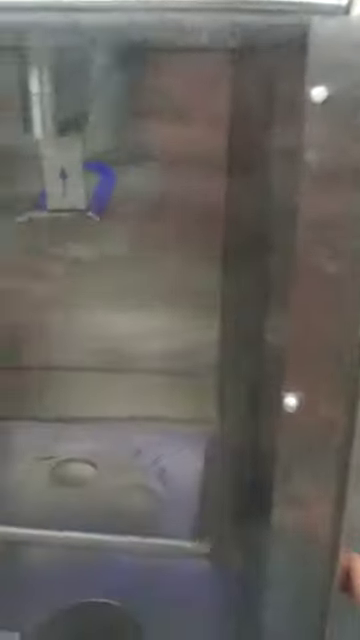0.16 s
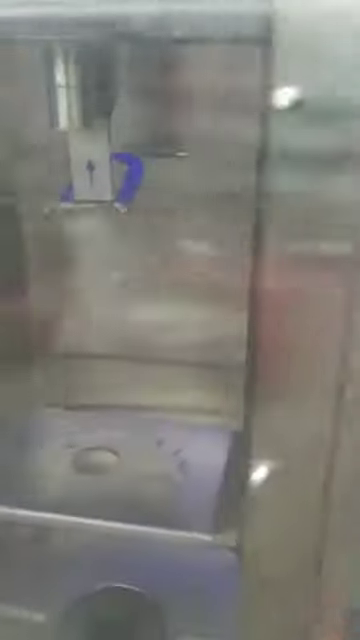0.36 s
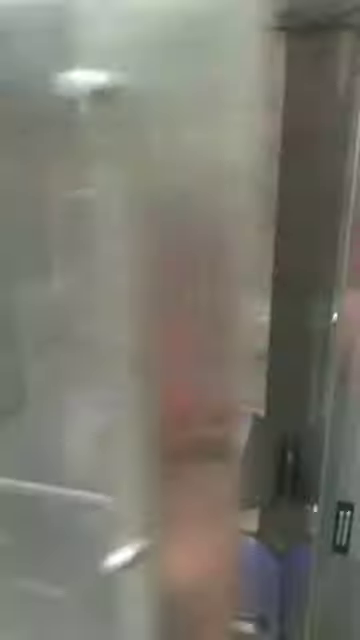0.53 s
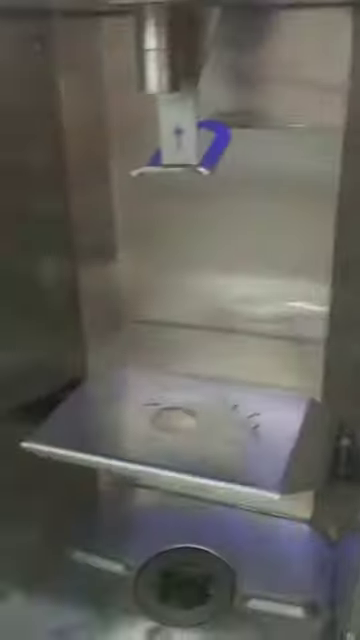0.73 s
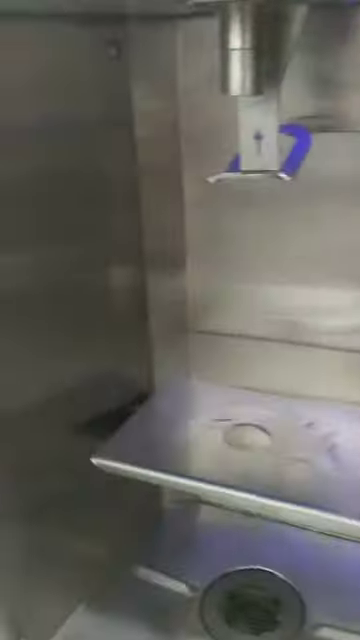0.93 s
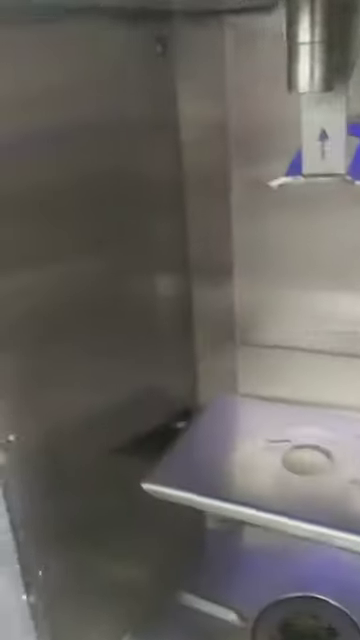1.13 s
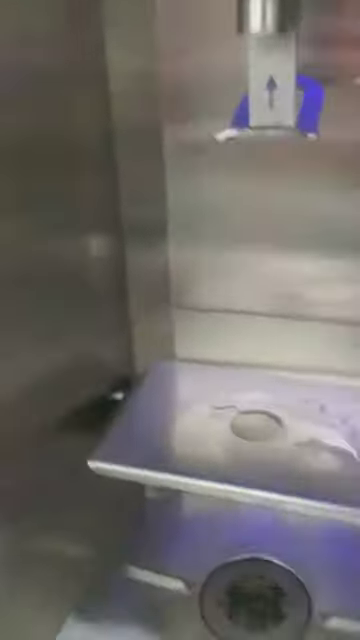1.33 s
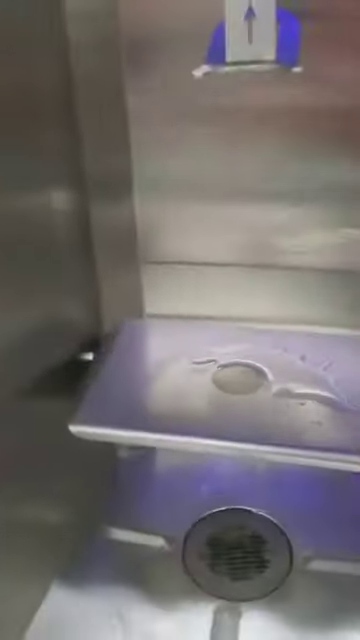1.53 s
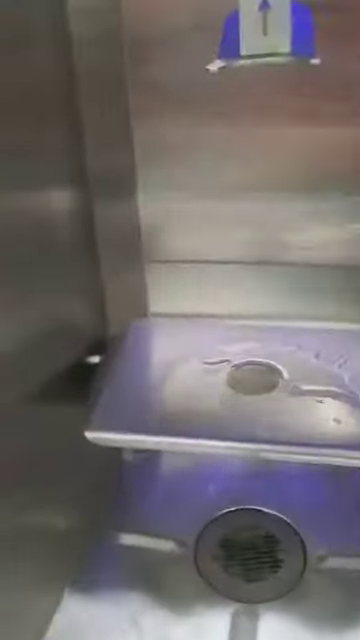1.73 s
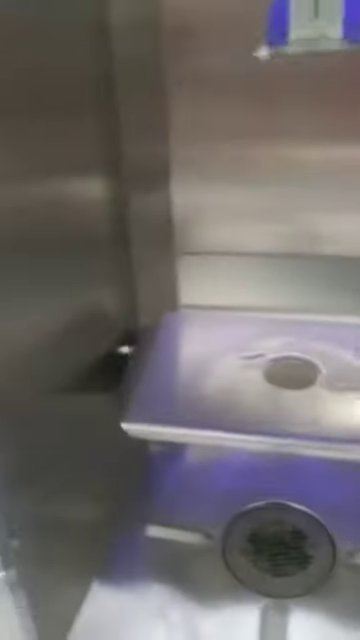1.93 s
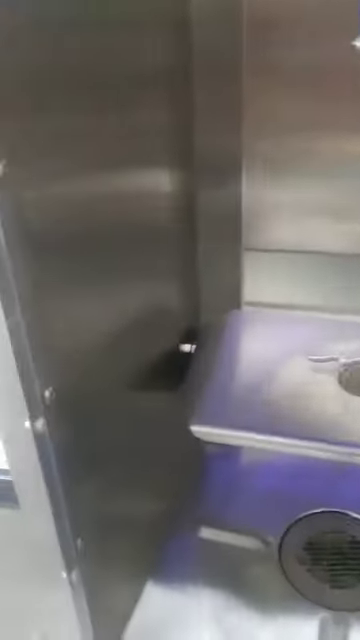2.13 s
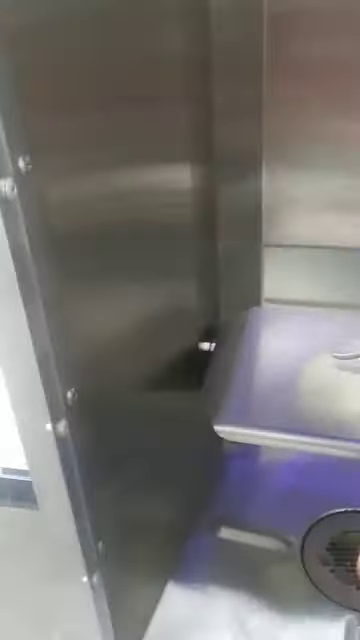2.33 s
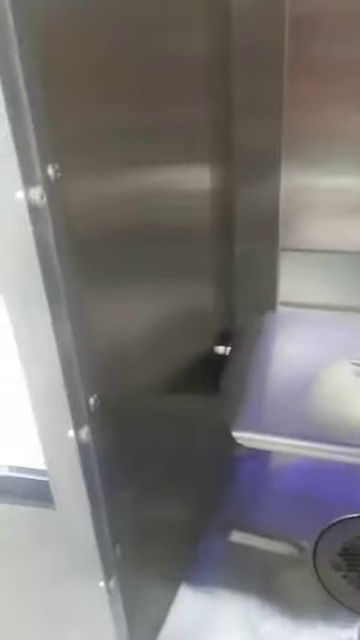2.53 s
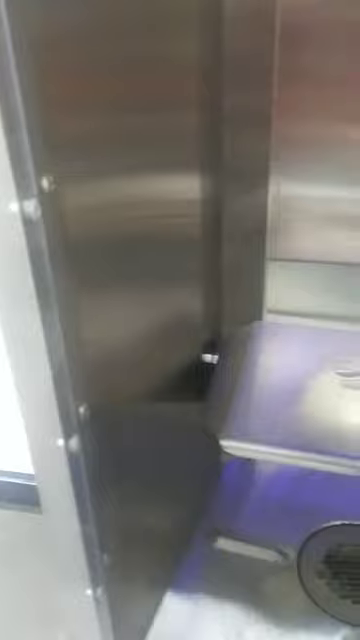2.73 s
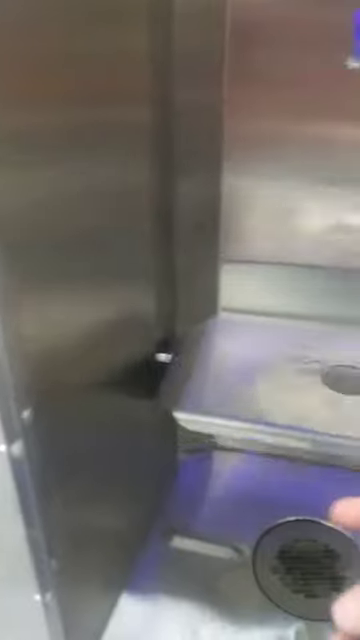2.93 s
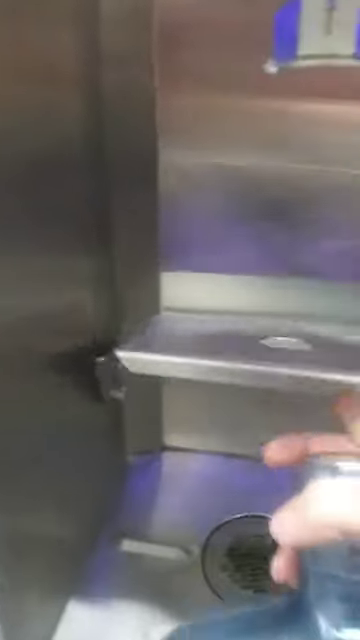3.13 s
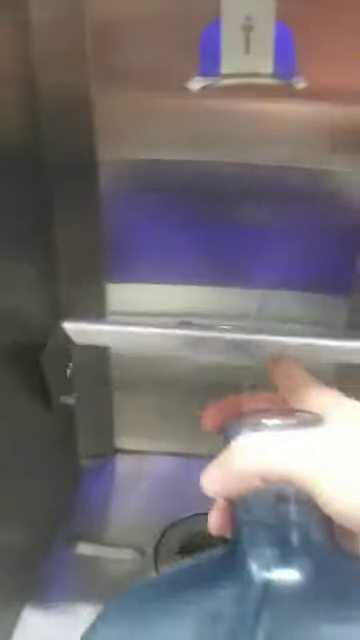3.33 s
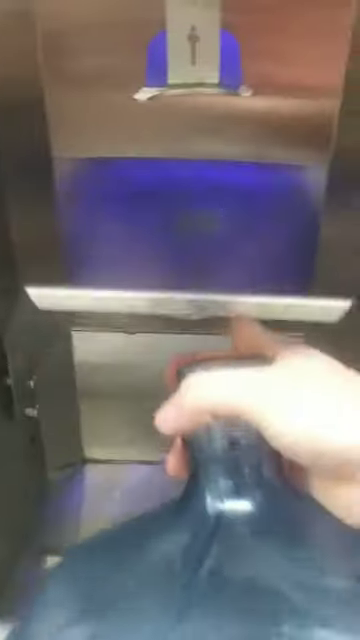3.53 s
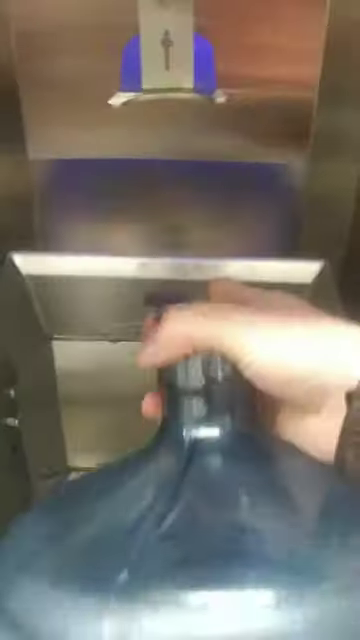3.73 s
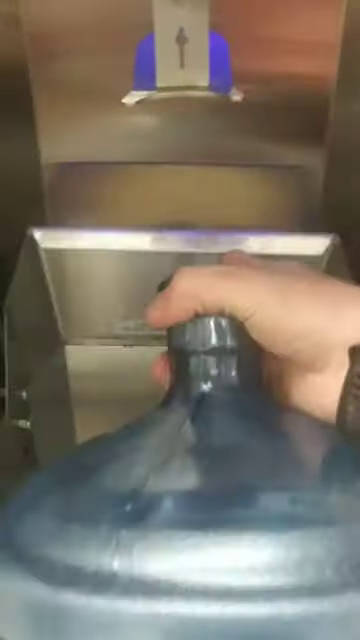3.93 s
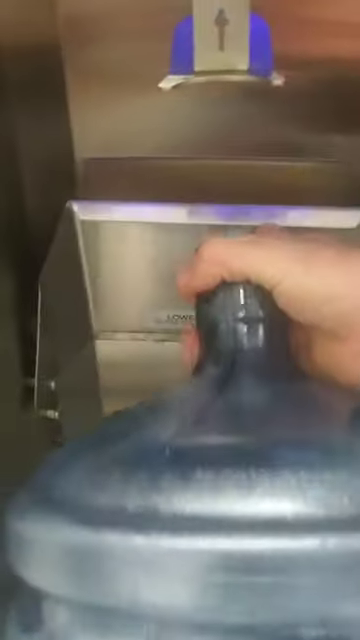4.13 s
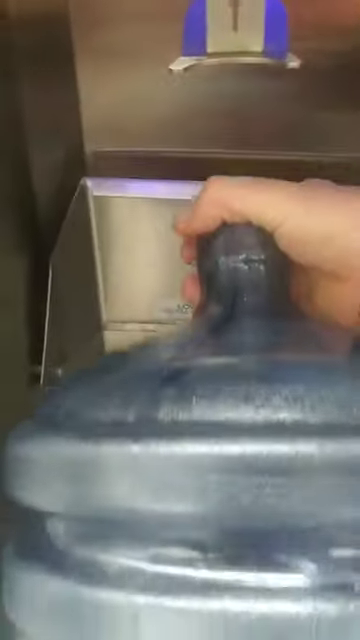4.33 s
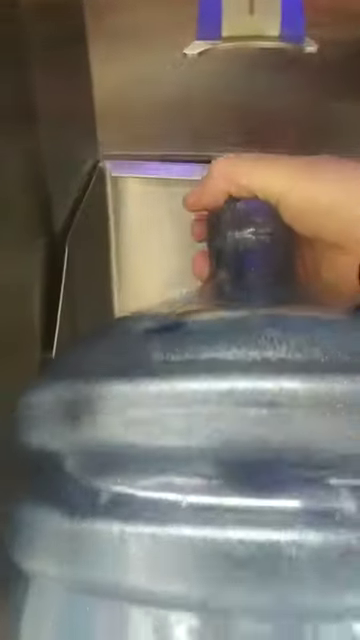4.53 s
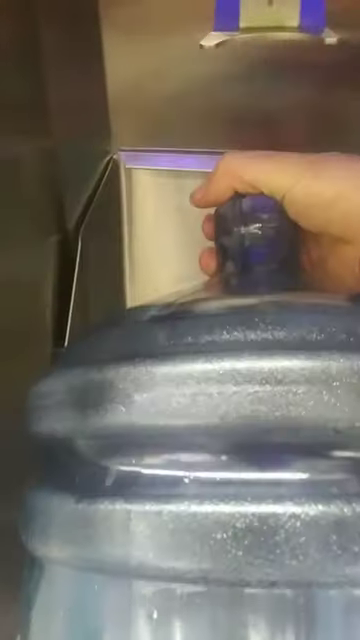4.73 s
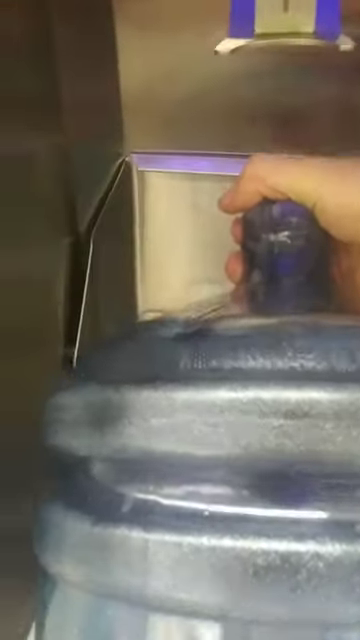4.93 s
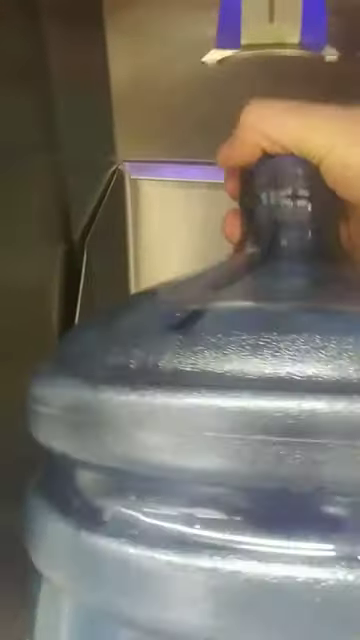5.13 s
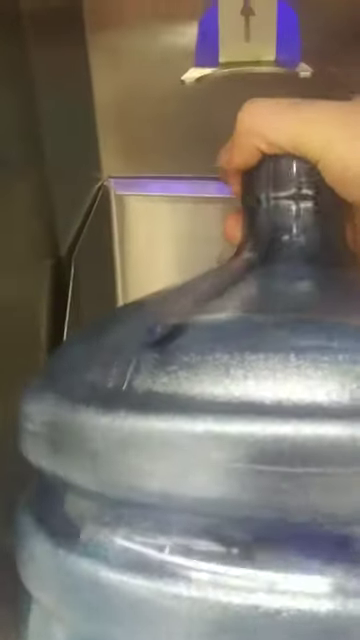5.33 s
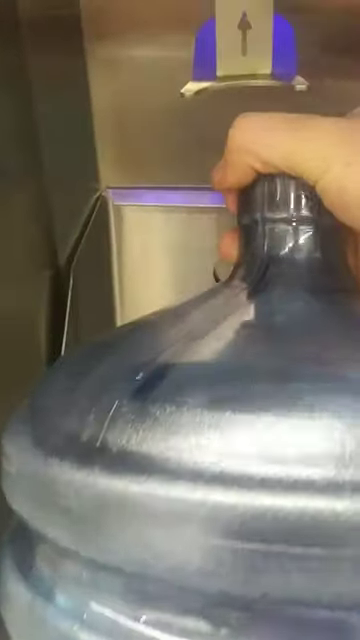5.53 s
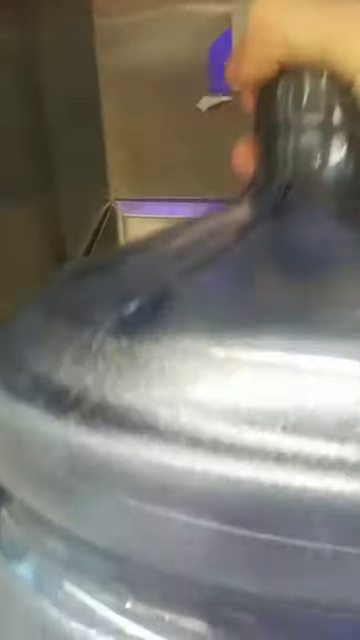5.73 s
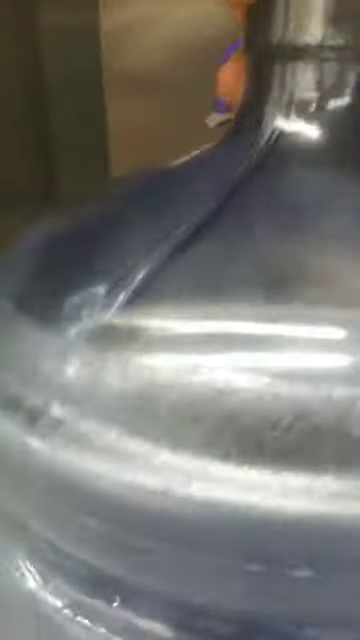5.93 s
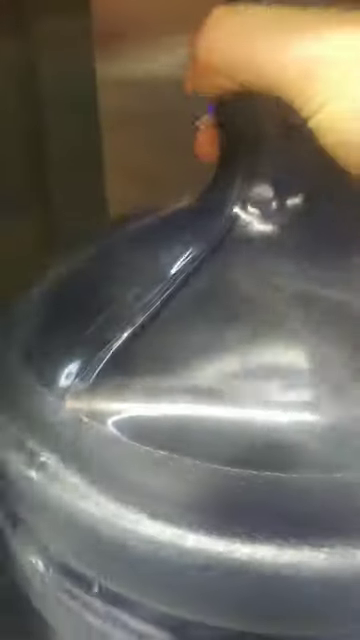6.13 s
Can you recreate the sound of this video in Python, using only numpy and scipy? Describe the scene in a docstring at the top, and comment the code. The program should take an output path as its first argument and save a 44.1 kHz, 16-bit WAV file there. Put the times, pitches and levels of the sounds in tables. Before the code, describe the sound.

A low, wavering machine hum and fan rumble run throughout, heard close up at the mouth of a steel water refill compartment. A sleeve brushes softly near the microphone, with small handling ticks. At about 0.3 seconds a door latch clicks, a light tap follows near 2 seconds, and at 2.5 the steel door meets its stop with a ringing clunk. A faint, thin hiss begins around 3.1 seconds. From 3.6 to 4.5 an empty plastic jug knocks against a hinged flap and the walls in a quick run of loud, hollow thumps. At 4.7 the flap claps on the back wall, sharp and bright. Around 5 seconds the jug squeaks faintly and scrapes along the steel in short, groaning shoves. Heavy bumps land at about 5.3, 5.4, 5.7 and 5.8 seconds, each leaving the sheet metal ringing.

```python
"""A machine hums and a sleeve brushes past, close to a phone microphone at the mouth of a water-refill
compartment. The steel door is unlatched and swings open against its stop. An empty plastic jug is
brought up with a thin hiss and shoved in: it knocks a hinged flap up, the flap claps on the back wall,
and the jug scrapes, squeaks and bumps into place. Every blow rings the sheet-steel cabinet."""
import sys
import numpy as np
from scipy import signal
from scipy.fft import rfft, irfft
from scipy.io import wavfile
from scipy.ndimage import uniform_filter1d

SR = 44100
rng = np.random.default_rng(int(sys.argv[2]) if len(sys.argv) > 2 else 0)


def inscribe(sig):
    """Save sig as 16-bit PCM at rate SR to the path in sys.argv[1].

    A 1-D sig is mono; a 2-D sig holds one channel per row.
    Samples are clipped to [-1, 1] before scaling.
    """
    pcm = np.round(np.clip(np.atleast_2d(sig).T, -1, 1) * 32767)
    wavfile.write(sys.argv[1], SR, pcm.astype(np.int16))


N = 272097
TIME = np.arange(N) / SR
RING_TIME, BLOW_TIME = TIME[:int(1.6 * SR)], TIME[:int(.45 * SR)]

# hum of the machine behind the cabinet: time_s, level_db
HUM_LEVEL = [(0, -47.5), (.95, -43.5), (1.25, -63), (2.0, -50), (3.3, -47.5), (4.9, -56)]
# spectrum of its fan: frequency_hz, gain_db
FAN_COLOUR = [(25, 3.5), (55, 2.5), (85, -4), (125, 0.5), (220, -1), (340, 2), (550, -7), (900, -12),
              (1800, -18.5), (3500, -28), (7000, -30.5), (10000, -39), (15000, -43)]
# hand and sleeve brushing past: start_s, length_s, level_db
SLEEVE_STROKES = [(0, 0.047, -47.5), (0.61, 0.12, -60), (0.864, 0.071, -60.5), (1.497, 0.023, -62),
                  (1.727, 0.017, -52), (2.987, 0.11, -46.5), (3.316, 0.47, -63.5), (3.816, 0.15, -56),
                  (4.25, 0.28, -59)]
# spectrum of that brushing: frequency_hz, gain_db
SLEEVE_COLOUR = [(200, -25), (1000, -7), (2500, 6.5), (4000, 5), (5100, 4), (7500, 7), (10000, 1),
                 (15000, -5.5)]
# small handling ticks: start_s, level_db
HAND_TICKS = [(.434, -54), (1.098, -56), (1.985, -54), (2.099, -51.5), (2.641, -44)]
# hard edges of steel and plastic at first touch: start_s, level_db
EDGE_SNAPS = [(.3222, -36), (1.945, -44), (2.472, -40), (4.7077, -17.5), (5.2878, -35)]
# latch, door and jug striking the cabinet, each a soft thud plus a hard crack (short contact is brighter):
# start_s, thud_db, thud_top_hz, crack_db, crack_top_hz, crack_fall_db_per_octave,
# tail_db, flap_ring_db, back_ring_db, damping_db_per_s
CABINET_BLOWS = [(.323, -49, 350, -47.5, 10000, 10, -1, -69, -68, 40),
                 (.331, -37.5, 480, -44.5, 4000, 3, -4, -58, -53, 40),
                 (1.956, -42, 950, -53, 1500, 3, 0, -57, -68, 30),
                 (2.473, -27.5, 900, -29.5, 4030, 3, 2.5, -64, -67, 20),
                 (2.484, -30.5, 720, -36.5, 4500, -3, 1, -38.5, -42.5, -2),
                 (3.593, -18, 695, -32.5, 2000, 6, -1, -27, -45, 0),
                 (3.711, -18, 650, -43.5, 3000, 5, -4, -30, -45, 30),
                 (3.802, -17, 670, -41, 2200, 6.5, -11, -33.5, -58, 19),
                 (3.845, -19, 600, -42.5, 2010, 12, -11.5, -27.5, -51, 10),
                 (3.887, -28, 456, -45.5, 2000, 6, -9, -55, -61, 18),
                 (3.929, -27, 452, -49, 3520, 4, -4, -32, -50, 0),
                 (4.036, -25.5, 527, -47, 3000, 8, 0, -32, -53, 19),
                 (4.314, -23, 480, -39, 1614, 6.5, -1, -26.5, -47, 11),
                 (4.337, -30.5, 458, -43, 1600, 14, -4, -57, -55, 18),
                 (4.482, -34.5, 400, -40, 2015, 26, 3, -41.5, -53, 11),
                 (4.707, -33, 695, -15, 9600, 1.5, -2, -38, -28.5, 47),
                 (5.143, -27, 300, -41.5, 2500, 18, -3, -40, -55, 29),
                 (5.206, -35, 350, -42.5, 2500, 12, -7, -53, -36, 41),
                 (5.232, -28, 400, -41.5, 2500, 8, -7, -52, -47, 40),
                 (5.286, -18, 440, -18, 4600, 5, -1, -38, -16, 19),
                 (5.3825, -20.5, 504, -26, 1800, 8.5, -3.5, -30, -49, 27),
                 (5.575, -28, 402, -55, 1800, 11, -4, -49, -41, 46),
                 (5.7233, -20, 487, -26.5, 2420, 7.5, -11, -30, -25, 48),
                 (5.807, -21, 320, -28.5, 2600, 3.5, -4, -34, -38, 14)]
# crowded, short-lived modes of plastic and steel: frequency_hz, base_t60_s, tail_t60_s, tail_db
KNOCK_DECAY = [(100, 0.14, 1, -10.5), (350, 0.093, 0.65, -3.5), (790, 0.17, 0.52, -7),
               (2000, 0.11, 0.55, -18.5), (7000, 0.044, 0.33, -15), (10860, 0.055, 0.14, -16)]
# hollow shell of the jug: pitch_hz, level_db, t60_s
JUG_SHELL = [(128, -7, 0.15), (170.8, 1.5, 0.21), (227.7, 1.5, 0.13), (315.8, -1.5, 0.19),
             (388.3, -0.5, 0.17), (471.5, -1.5, 0.066), (544.3, -4.5, 0.15), (649.6, 4, 0.071),
             (697, -7.5, 0.28), (775, -14, 0.16), (880, -20, 0.1), (1113, -10, 0.13), (1254, -11.5, 0.19),
             (1495, -4.5, 0.17), (1890, -7, 0.15), (2184, -10, 0.17), (2960, -8, 0.1), (4820, -4.5, 0.069)]
# flap and side walls: pitch_hz, level_db, t60_s
FLAP_AND_SIDES = [(117.97, 0, 1.7), (164.35, 1, 1.62), (197, -5, 0.2), (215.9, 2, 0.81), (249.2, 1, 1.34),
                  (316, -5.5, 1.13), (357, -15, 0.73), (470, -32, 0.33), (549, -7.5, 0.56), (627, -5, 0.32),
                  (688, -15, 0.22), (759, -9, 0.29), (1140, -13.5, 0.42), (2030, -8.5, 0.36),
                  (2860, -16, 0.16)]
# back wall: pitch_hz, level_db, t60_s
BACK_WALL = [(120.7, -13, 3.3), (208.4, 1.5, 0.47), (242, -6, 3), (242.3, -12, 1.7), (327, -2, 0.18),
             (360.2, 6, 0.85), (385.6, -2, 0.42), (422.5, -6.5, 0.75), (449, -4, 0.95), (627, -9, 0.88),
             (801, -16.5, 0.97), (928, -15.5, 0.86), (1016, -26, 0.27), (1120, -15.5, 0.44),
             (1347, -20.5, 0.65), (1490, -24, 0.3), (1670, -15, 0.18), (1890, -12.5, 0.16),
             (2210, -26, .35)]
# steel door: pitch_hz, level_db, t60_s
STEEL_DOOR = [(108, -13, 1.2), (116.7, -14, 3.9), (180.4, 5.5, 0.14), (320, -2.5, 0.29), (414, -8, 0.62),
              (464, -8, 0.44), (547, -16, 0.15), (631, -6, 0.25), (752, -22, 0.13), (1045, -14, 0.17),
              (1460, -22, .3), (1590, -18, 0.18), (1670, -12.5, 0.13), (2350, -26, 0.23)]
# thin, high hiss: time_s, level_db
HISS_LEVEL = [(3.0, -97), (3.11, -60), (3.4, -65.5), (3.95, -62), (4.19, -71), (4.33, -68), (4.6, -66.5),
              (5.2, -71), (5.6, -74), (5.95, -80)]
# blows landing on a spot with a note of its own: start_s, pitch_hz, level_db, t60_s
STRUCK_SPOTS = [(3.597, 2820, -32, 0.075), (3.594, 770, -14.5, 0.076), (3.594, 224, -19, 0.11),
                (3.595, 1190, -33, 0.11), (3.713, 3890, -37.5, 0.036), (3.712, 477, -22, 0.1),
                (3.712, 548, -22.5, .19), (3.803, 393, -21, 0.15), (3.803, 668, -25, .065),
                (3.846, 543, -20, 0.056), (3.846, 169, -16, 0.16), (3.848, 1270, -34.5, .1),
                (3.86, 247.8, -20, .4), (3.93, 246.5, -24, 0.27), (4.037, 369, -26.5, 0.14),
                (5.204, 383.2, -18, 0.27), (5.204, 305, -25.5, 0.39), (5.287, 116, -15.5, 0.48),
                (5.288, 690, -24, .25), (5.288, 1044, -29.5, .3), (5.383, 1120, -24.5, 0.14),
                (5.386, 1670, -24, 0.076), (5.384, 624, -28, 0.31), (5.724, 385.3, -9, 0.11),
                (5.724, 545, -24.5, .3), (5.725, 930, -37, .16), (5.725, 1102, -30.5, .14),
                (5.724, 1900, -28, 0.13), (5.807, 357, -19.5, 0.14), (5.807, 706, -21.5, 0.15),
                (5.807, 799, -36.5, 0.54), (5.807, 877, -31, 0.18), (5.806, 1350, -42, 0.44),
                (5.806, 1486, -30, 0.16), (5.807, 2072, -28.5, 0.091)]
# the jug sliding on steel, shove by shove: start_s, length_s, scrape_db, groan_db
JUG_SHOVES = [(4.32, 0.073, -44.5, -40), (4.482, 0.034, -34.5, -37), (4.596, 0.049, -51, -46),
              (4.977, 0.11, -43, -49), (5.083, 0.071, -44.5, -35), (5.129, 0.061, -33.5, -24),
              (5.197, 0.022, -48, -26), (5.301, 0.034, -25.5, -27), (5.422, 0.039, -36.5, -25.5),
              (5.51, 0.14, -42, -35), (5.67, 0.037, -39.5, -38), (5.698, 0.016, -33.5, -40),
              (5.774, 0.049, -39.5, -41)]
# spectrum of the scrape: frequency_hz, gain_db
RUB_COLOUR = [(50, -10), (110, -30), (230, -0.5), (390, 5), (550, -9), (1000, -15.5), (1900, -7.5),
              (3000, -18.5), (4500, -18.5), (8000, -23.5), (15000, -39)]
# stiff lip of the flap, ringing only when struck itself: pitch_hz, level_db, t60_s
FLAP_LIP = [(167.5, -13.5, 0.52), (348.5, 1.5, 0.22), (385, 1, 0.23), (426, -5.5, 0.28), (528, -5, 0.11),
            (741, -8, 0.19), (825, -2.5, .11), (1320, 0.5, 0.064), (1420, -1.5, 0.084), (1714, -4.5, 0.082),
            (1900, -1.5, 0.062), (2210, -7, 0.13), (3315, -9, 0.062), (4120, -16, .09), (4700, -12, .12),
            (5250, -11, 0.085), (6900, -4, 0.052)]
# dry plastic squeaking on steel: start_s, length_s, pitch_hz, level_db
JUG_SQUEAKS = [(4.983, 0.076, 4270, -53.5), (4.985, 0.05, 2225, -60), (4.98, 0.05, 3900, -58),
               (5.03, .07, 2000, -61)]
# response of the microphone port: frequency_hz, gain_db
MIC_PORT = [(4000, 0), (5100, 2), (5600, -3), (6300, -1), (7200, 5.5), (7650, 4), (8150, -3.5), (10500, -6),
            (14000, -4)]


def undb(db):
    """Decibels to gain."""
    return np.exp(np.asarray(db) * (np.log(10) / 20))


def unit(x):
    """Scale to rms 1."""
    return x / np.sqrt(np.mean(x ** 2))


def level_curve(table):
    """A table of times and levels, drawn out to one level a sample."""
    return np.interp(TIME, *np.transpose(table))


def at_pitch(hz, table):
    """Columns of a frequency table, read on a log axis."""
    points, *columns = np.transpose(table)
    return [np.interp(np.log(hz + 1), np.log(points), column) for column in columns]


def colour(x, table, size=4096):
    """Minimum-phase filter with the table's frequency response."""
    gain_db = at_pitch(np.fft.rfftfreq(size, 1 / SR), table)[0]
    cepstrum = irfft(np.log(undb(gain_db)))
    cepstrum[1:size // 2] *= 2
    cepstrum[size // 2 + 1:] = 0
    return signal.fftconvolve(x, irfft(np.exp(rfft(cepstrum))))[:len(x)]


def band_noise(low_hz, high_hz, count):
    """Noise of rms 1 between two frequencies."""
    sos = signal.butter(3, [low_hz, min(high_hz, .45 * SR)], "band", fs=SR, output="sos")
    return unit(signal.sosfilt(sos, rng.standard_normal(count)))


def walk(rate_hz):
    """Smooth random wander of rms 1."""
    hold = int(SR / rate_hz)
    steps = np.repeat(rng.standard_normal(N // hold + 1), hold)
    return unit(uniform_filter1d(uniform_filter1d(steps, hold), hold)[:N])


def add(track, start_s, sound):
    """Mix a sound in at a time."""
    start = int(start_s * SR)
    track[start:start + len(sound)] += sound[:N - start]


def stroke(start_s, length_s, attack_s=0.009, release_s=0.03):
    """Envelope of one rub: it rises, holds to the end of its length and dies away."""
    since = TIME - start_s
    return np.clip(since / attack_s, 0, 1) * np.exp(-np.clip((since - length_s) / release_s, 0, 20))


def slips(per_s, spread_db, t60_s):
    """Stick-slip: little releases at random moments, each ringing briefly."""
    releases = rng.random(N) < per_s / SR
    strength = undb(spread_db * np.clip(rng.standard_normal(N), -2, 2))
    burst = rng.standard_normal(len(BLOW_TIME)) * undb(-60 * BLOW_TIME / t60_s)
    return signal.fftconvolve(releases * strength, burst)[:N]


def ring(modes, rise_s=0.002):
    """Decaying modes that start in step, which gives the punch, and then drift apart."""
    t = RING_TIME
    waves = sum(undb(db - 60 * t / t60) * np.sin(2 * np.pi * hz * t) for hz, db, t60 in modes)
    return waves * (1 - np.exp(-t / rise_s))


def plateau(hz, low_hz, top_hz, fall_db):
    """Gain that fades below the low corner and slopes by fall_db an octave above the top one."""
    below = (low_hz / hz) ** 4
    above = undb(fall_db * np.log2(hz / top_hz)) ** 2
    return 1 / np.sqrt((1 + below) * (1 + above))


def drive(hz):
    """How hard each blow's thud and crack together drive a frequency, as a column of gains."""
    _, thud_db, thud_hz, crack_db, crack_hz, crack_fall_db = np.transpose(CABINET_BLOWS)[:6]
    thud = undb(thud_db) * plateau(hz, low_hz=132, top_hz=thud_hz, fall_db=26)
    crack = undb(crack_db) * plateau(hz, low_hz=380, top_hz=crack_hz, fall_db=crack_fall_db)
    return np.hypot(thud, crack)[:, None]


def machine(hum_hz=247, wander_hz=2.32, waver=0.089, fan_db=-43.5, follow=0.062):
    """Behind the cabinet, a wavering hum and a fan rumble that faintly follows its swells."""
    hum_db = level_curve(HUM_LEVEL)
    rumble_db = fan_db + follow * (hum_db - hum_db.mean()) + 0.5 * walk(5.38)
    rumble = unit(colour(rng.standard_normal(N), FAN_COLOUR))
    flutter = 1 + waver * walk(21)
    phase = 2 * np.pi * np.cumsum(hum_hz + wander_hz * walk(19)) / SR
    return undb(rumble_db) * rumble + undb(hum_db) * unit(flutter * np.sin(phase))


def handling(rustle_db=-65.5, rest_s=5.4, attack_s=0.02, tick_t60_s=0.15):
    """Hand and sleeve near the microphone: brushes and ticks over a faint rustle, until the hand rests."""
    touch = undb(rustle_db) * stroke(0, rest_s, attack_s, release_s=0.02)
    for start_s, length_s, db in SLEEVE_STROKES:
        touch += undb(db) * stroke(start_s, length_s, attack_s, release_s=0.55 * length_s)
    for start_s, db in HAND_TICKS:
        add(touch, start_s, undb(db - 60 * BLOW_TIME / tick_t60_s))
    friction = slips(per_s=3000, spread_db=0, t60_s=0.017)
    return touch * unit(colour(friction, SLEEVE_COLOUR))


def snaps(band_hz=(6000, 14000), t60_s=0.026):
    """Hard edges meet with a thin, very short click."""
    out = np.zeros(N)
    for start_s, db in EDGE_SNAPS:
        add(out, start_s, undb(db - 60 * BLOW_TIME / t60_s) * band_noise(*band_hz, len(BLOW_TIME)))
    return out


def knocks(chatter_s=0.0069, treble_hz=10000):
    """The body of each blow: crowded modes in third-octave bands, a quick decay, then the cabinet's tail."""
    out, t = np.zeros(N), BLOW_TIME
    blows = np.array(CABINET_BLOWS)
    starts_s, thud_top_hz, blow_tail_db = blows[:, 0], blows[:, 2:3], blows[:, 6:7]
    stretch = 0.83 * 1.6 ** np.log2(500 / thud_top_hz)  # a slow, deep contact feeds the shell for longer
    free_s = np.maximum(t - chatter_s, 0)  # the surfaces chatter for a moment before they part
    sounds = 0
    for hz in 125 * 2 ** (np.arange(22) / 3):
        noise = band_noise(hz / 2 ** (1 / 6), hz * 2 ** (1 / 6), N + len(t))
        base_t60, tail_t60, tail_db = at_pitch(hz, KNOCK_DECAY)
        rise = 1 - np.exp(-t / (.0003 + .25 / hz))
        decay = undb(-60 * free_s / (base_t60 * stretch))
        tail = undb(tail_db + blow_tail_db - 60 * free_s / tail_t60)
        waves = np.array([noise[int(s * SR):][:len(t)] for s in starts_s]) * rise * (decay + tail)
        onset_rms = np.std(waves[:, :int(.03 * SR)], axis=1, keepdims=True)
        # modes crowd more towards the treble, but plastic is too soft for the very top
        crowding = undb(np.interp(hz, [300, 3500], [-13, -10]))
        softness = np.sqrt(1 + (hz / treble_hz) ** 4)
        sounds += waves / onset_rms * drive(hz) * crowding / softness
    for start_s, sound in zip(starts_s, sounds):
        add(out, start_s, sound)
    return out


def jug(shell_db=-4, spread_db=2, detune=0.006, rise_s=0.0007):
    """The shell's hollow modes; every blow weights and bends them a little differently."""
    out, t = np.zeros(N), BLOW_TIME[:len(BLOW_TIME) // 2]
    hz, db, t60 = np.transpose(JUG_SHELL)
    envelopes = undb(db[:, None] - 60 * t / t60[:, None]) * (1 - np.exp(-t / rise_s))
    gains = np.hstack([drive(mode_hz) for mode_hz in hz])
    for (start_s, *_), gain in zip(CABINET_BLOWS, gains):
        weight, bend = rng.standard_normal((2, len(hz)))
        waves = np.sin(2 * np.pi * np.outer(hz * (1 + detune * bend), t))
        levels = gain * undb(shell_db + spread_db * weight)
        add(out, start_s, levels @ (waves * envelopes))
    return out


def panels(soft_hz=700, hard_hz=4000):
    """Each blow sets the flap and the walls ringing; what stays pressed against them damps the ring."""
    out = np.zeros(N)
    flap, back = ring(FLAP_AND_SIDES), ring(BACK_WALL)
    for start_s, thud_db, _, crack_db, *_, flap_db, back_db, damping in CABINET_BLOWS:
        steel = undb(flap_db) * flap + undb(back_db) * back
        damped = steel * undb(-max(damping, 0) * RING_TIME)
        # a soft bump stays in contact too long to wake the high modes
        corner_hz = min(soft_hz + hard_hz * undb(crack_db - thud_db) ** 2, SR / 4)
        add(out, start_s, signal.sosfilt(signal.butter(2, corner_hz, fs=SR, output="sos"), damped))
    return out


def door_clunk(start_s=2.483, level_db=-20.5):
    """The steel door meets its stop and rings."""
    out = np.zeros(N)
    add(out, start_s, undb(level_db) * ring(STEEL_DOOR))
    return out


def hiss(low_band_hz=(4800, 5400), high_band_hz=(6400, 8000), flutter_db=2):
    """Two narrow, unsteady bands of hiss set in as the jug is brought up."""
    bands = band_noise(*low_band_hz, N) + band_noise(*high_band_hz, N)
    return bands * undb(level_curve(HISS_LEVEL) + flutter_db * walk(60))


def spot_notes(rise_cycles=0.66):
    """Short single notes of the plastic or steel right under a blow."""
    out, t = np.zeros(N), RING_TIME
    for start_s, hz, db, t60 in STRUCK_SPOTS:
        envelope = undb(db - 60 * t / t60) * (1 - np.exp(-t * hz / rise_cycles))
        add(out, start_s, envelope * np.sin(2 * np.pi * hz * t))
    return out


def sliding(groan_top_hz=490, damping_db_per_s=68, shell_db=8):
    """With each shove the jug scrapes along the steel, and the low modes of shell and walls groan."""
    rub = slips(per_s=4000, spread_db=3, t60_s=.022)
    walls = ring([mode for mode in FLAP_AND_SIDES + BACK_WALL if mode[0] < groan_top_hz])
    walls *= undb(-damping_db_per_s * RING_TIME)  # the sliding jug presses on them
    shell = ring([mode for mode in JUG_SHELL if mode[0] < groan_top_hz])
    body = walls + undb(shell_db) * shell
    scrape, push = 0, 0
    for start_s, length_s, scrape_db, groan_db in JUG_SHOVES:
        envelope = stroke(start_s, length_s)
        scrape += undb(scrape_db) * envelope
        push += undb(groan_db) * envelope
    catches = unit(slips(per_s=400, spread_db=2, t60_s=.0005))
    groan = signal.fftconvolve(push * catches, body / np.linalg.norm(body))[:N]
    return scrape * unit(colour(rub, RUB_COLOUR)) + groan


def flap_clap(start_s=4.707, level_db=-14):
    """At the back of the compartment, the flap's stiff lip claps on the wall and rings."""
    out = np.zeros(N)
    add(out, start_s, undb(level_db) * ring(FLAP_LIP))
    return out


def squeaks(width_hz=130):
    """Fast stick-slip gathers around a few pitches as a faint, rough chirp."""
    out = np.zeros(N)
    for start_s, length_s, hz, db in JUG_SQUEAKS:
        chirp = band_noise(hz - width_hz / 2, hz + width_hz / 2, N)
        out += undb(db) * chirp * stroke(start_s, length_s)
    return out


def scene():
    """Everything as heard from the mouth of the compartment, in mono."""
    blows = knocks() + jug() + spot_notes() + panels() + door_clunk() + flap_clap() + snaps()
    return (blows + sliding() + squeaks() + handling() + hiss() + machine())[None]


def record(dry, low_cut_hz=95, ceiling=0.85, top_hz=15600):
    """Phone microphone: its port colours the treble, the bass drops, peaks are rounded, the top is cut."""
    low_cut = signal.butter(4, low_cut_hz, "high", fs=SR, output="sos")
    top_cut = signal.ellip(8, .2, 80, top_hz, fs=SR, output="sos")
    heard = signal.sosfilt(low_cut, colour(dry[0], MIC_PORT))
    rounded = heard / (1 + (heard / ceiling) ** 4) ** (1 / 4)
    return signal.sosfilt(top_cut, rounded)[None]


dry = scene()
out = record(dry)
inscribe(out)
```